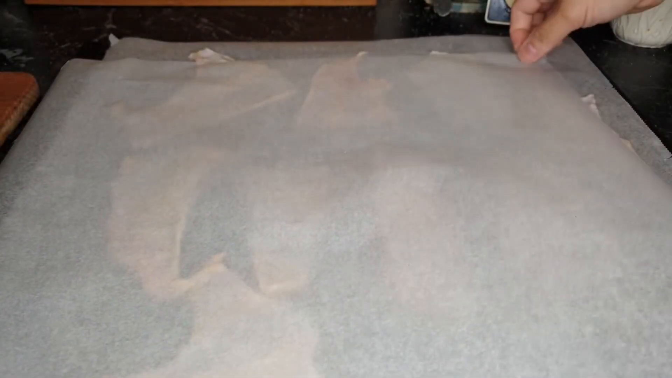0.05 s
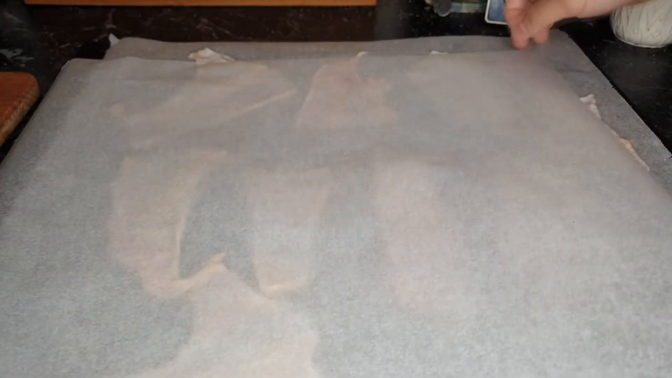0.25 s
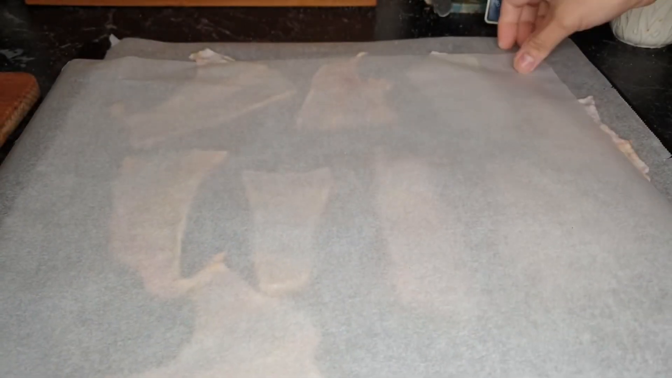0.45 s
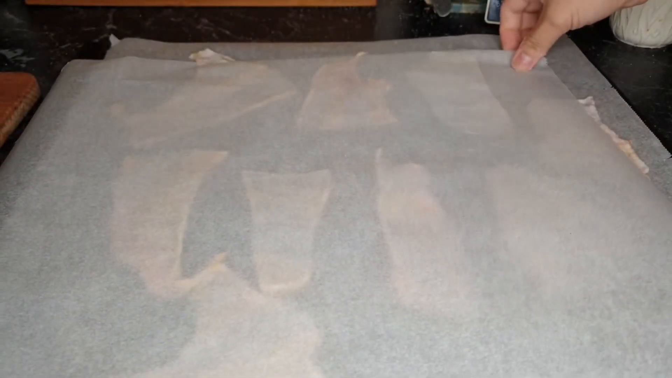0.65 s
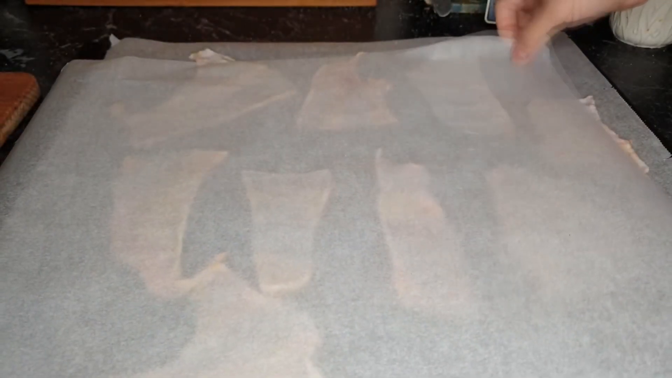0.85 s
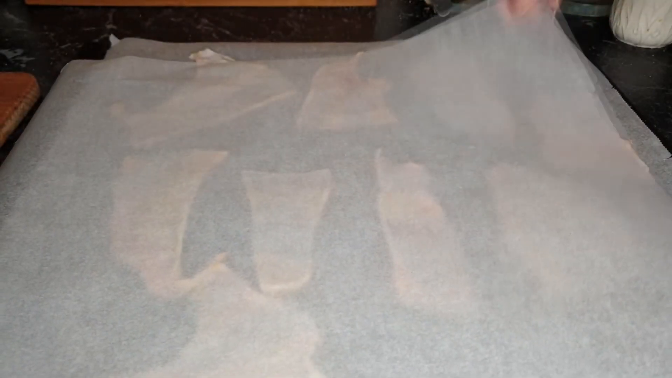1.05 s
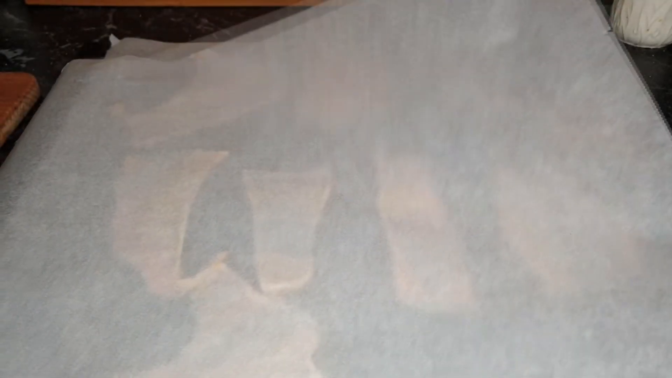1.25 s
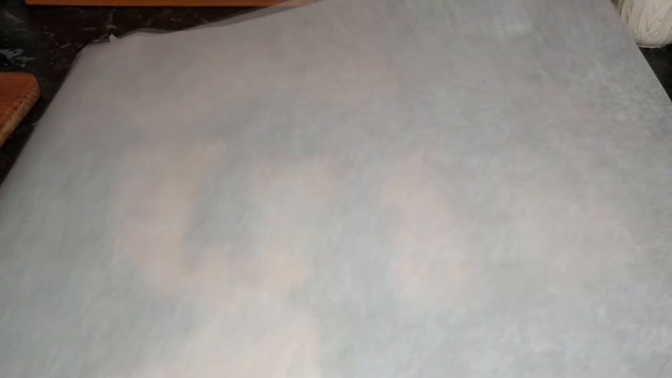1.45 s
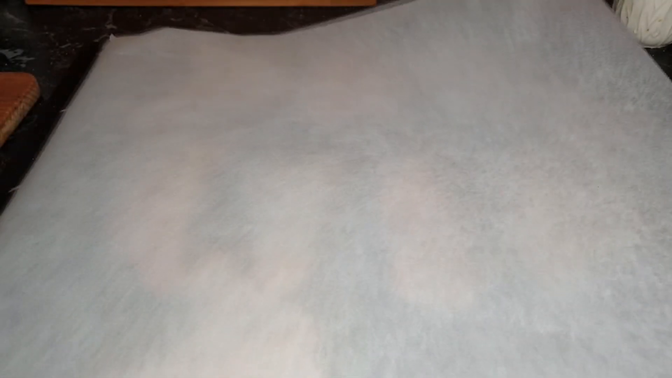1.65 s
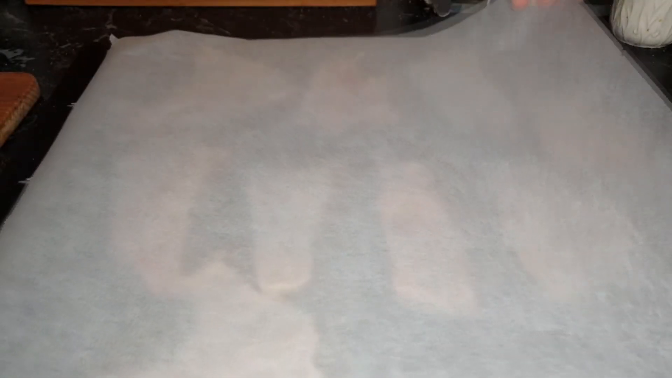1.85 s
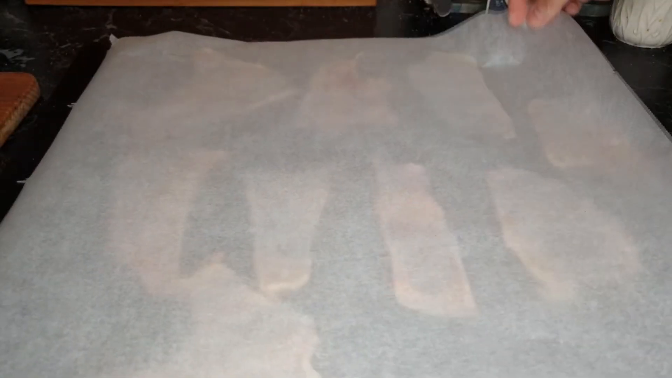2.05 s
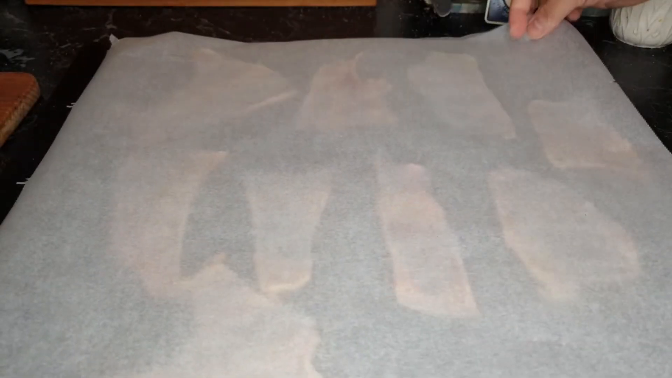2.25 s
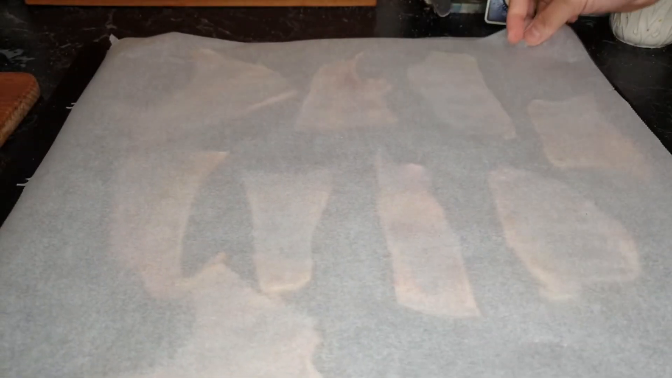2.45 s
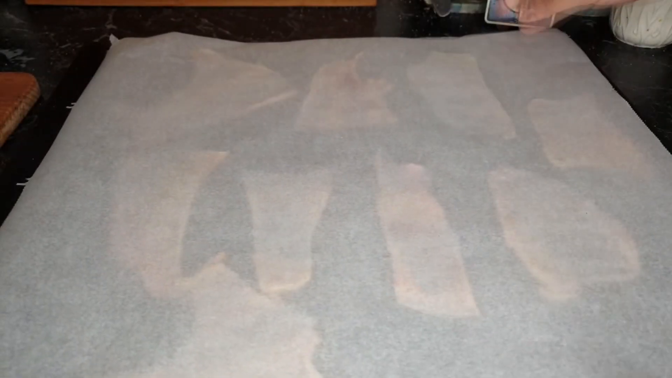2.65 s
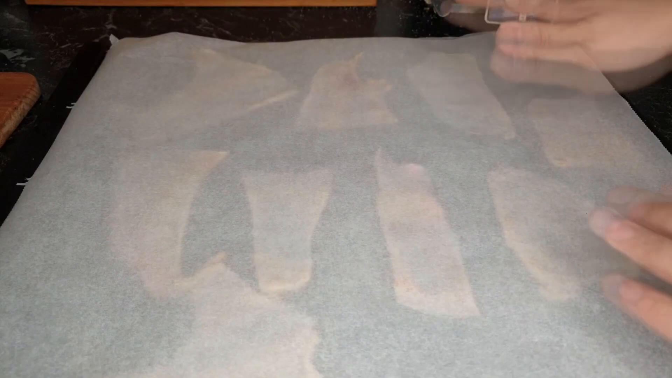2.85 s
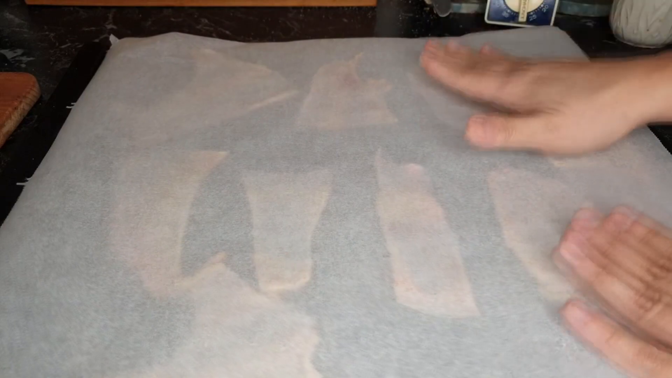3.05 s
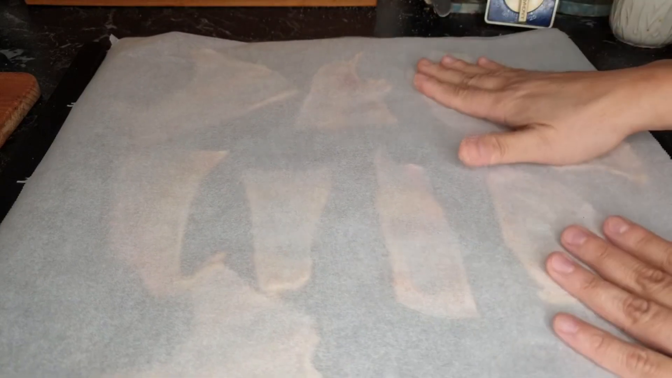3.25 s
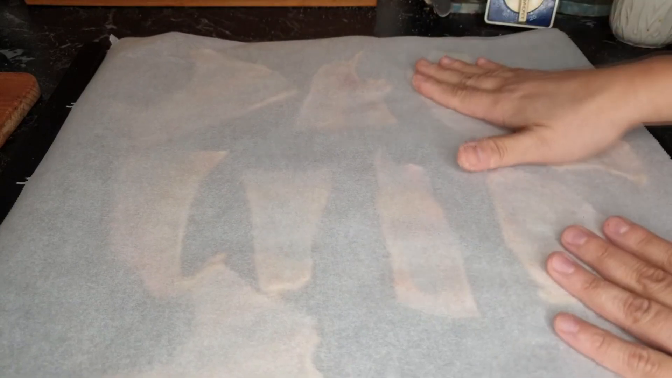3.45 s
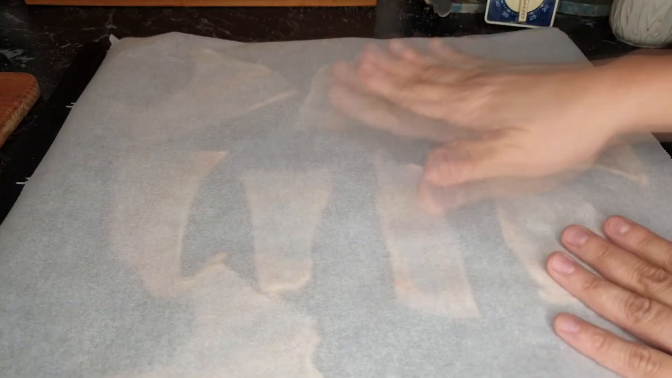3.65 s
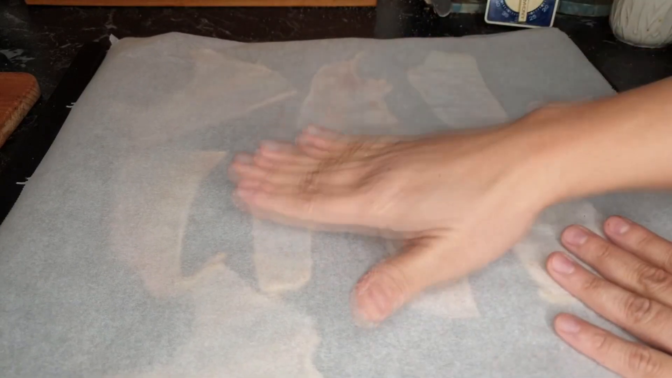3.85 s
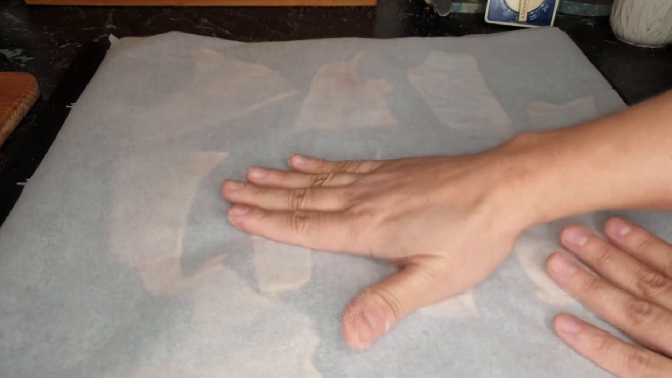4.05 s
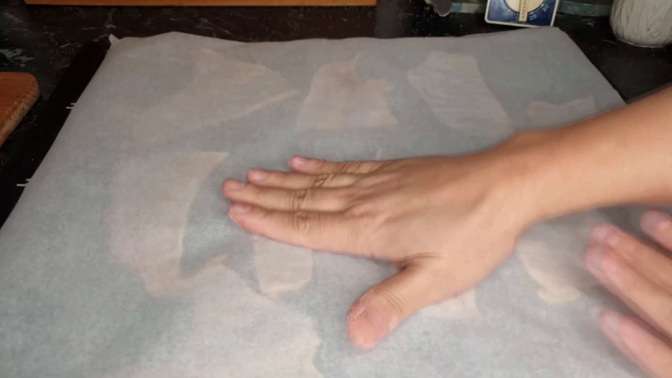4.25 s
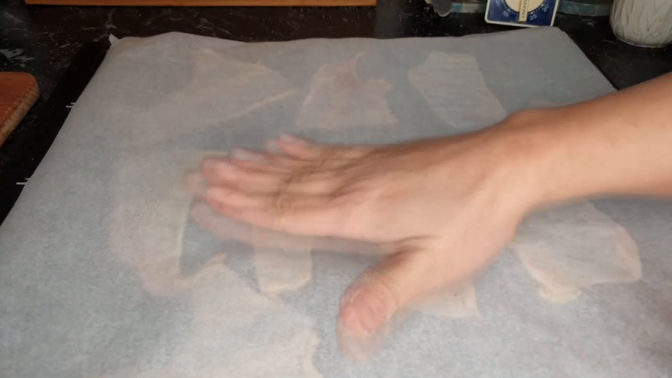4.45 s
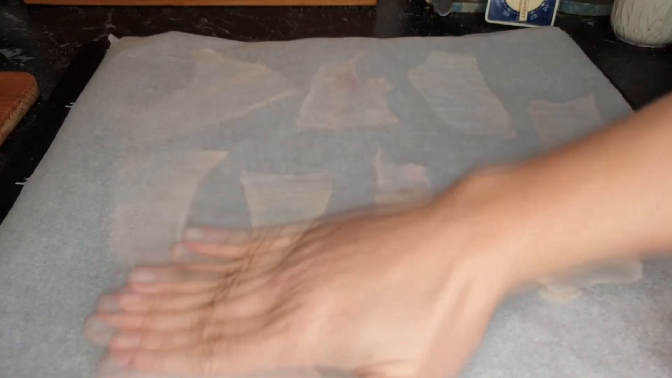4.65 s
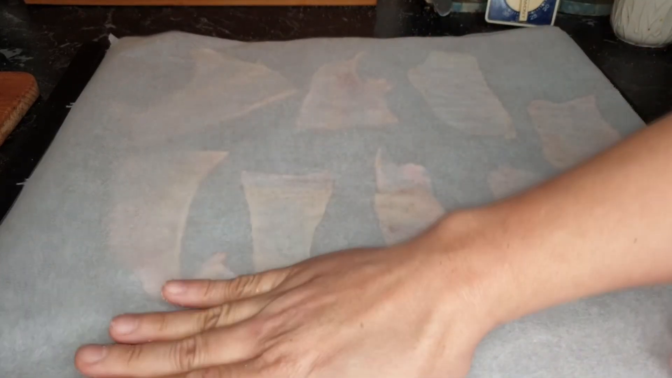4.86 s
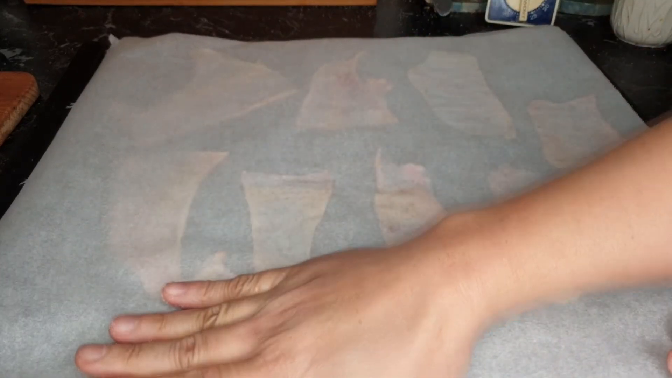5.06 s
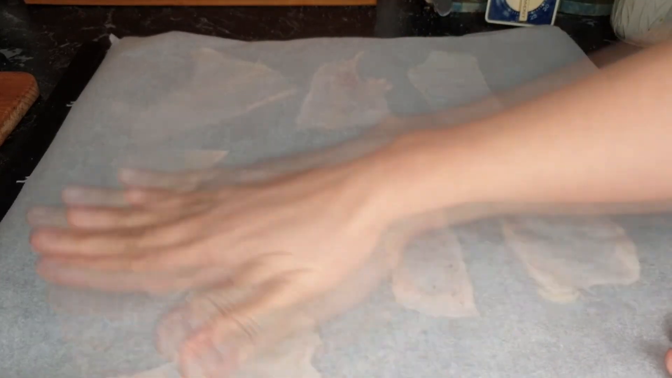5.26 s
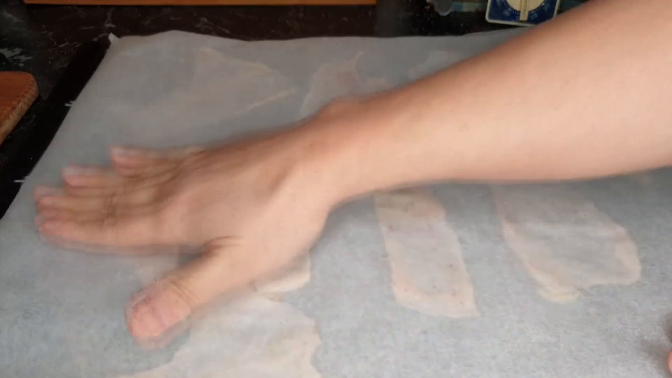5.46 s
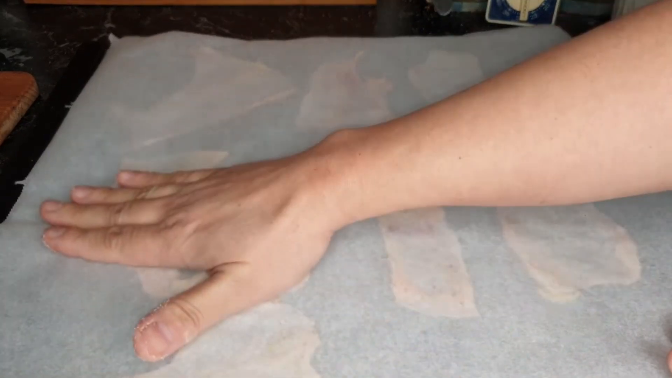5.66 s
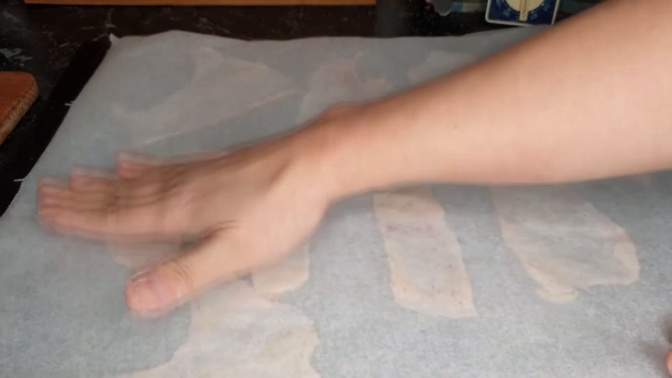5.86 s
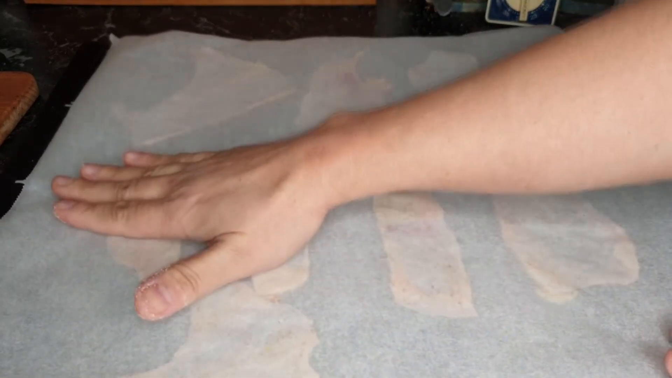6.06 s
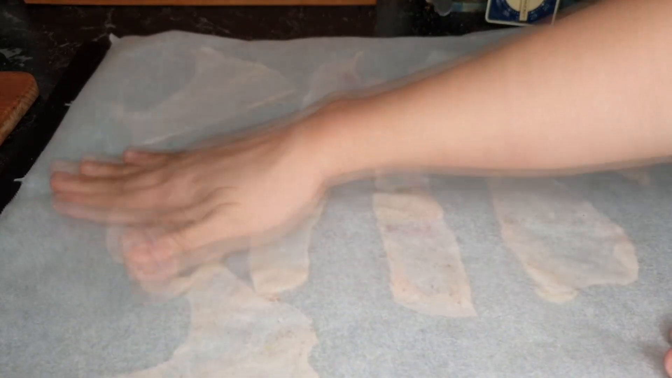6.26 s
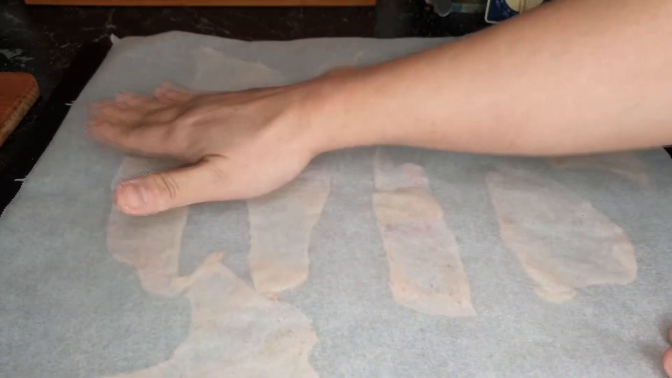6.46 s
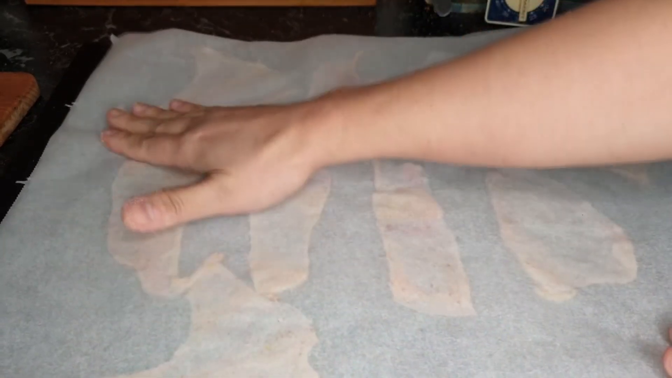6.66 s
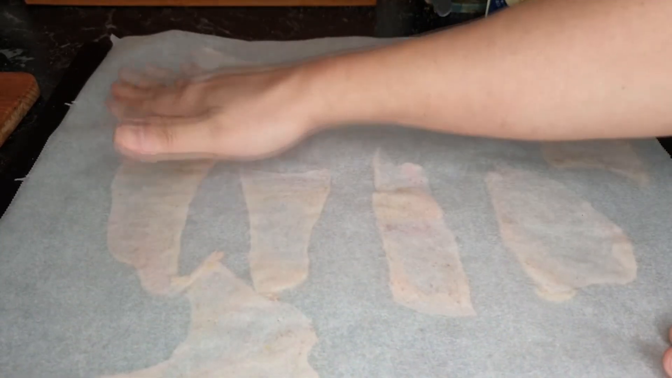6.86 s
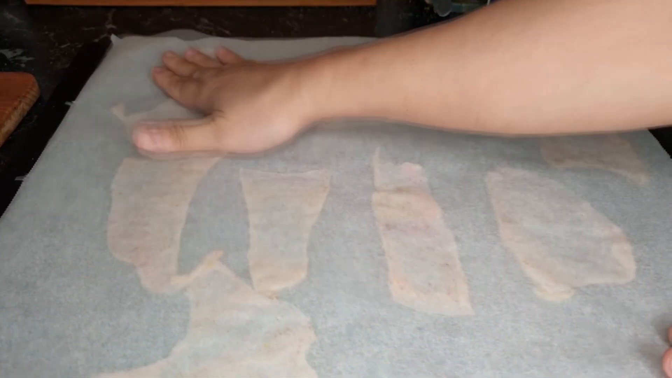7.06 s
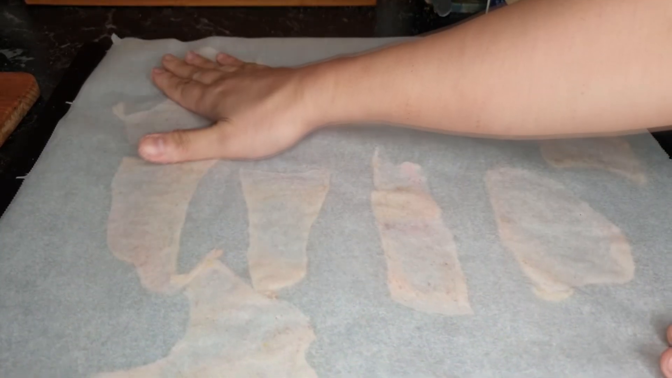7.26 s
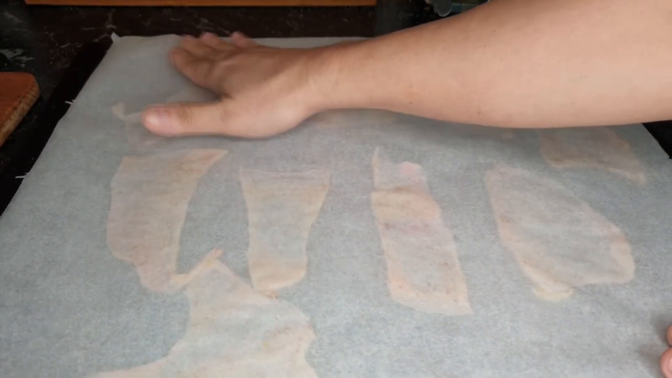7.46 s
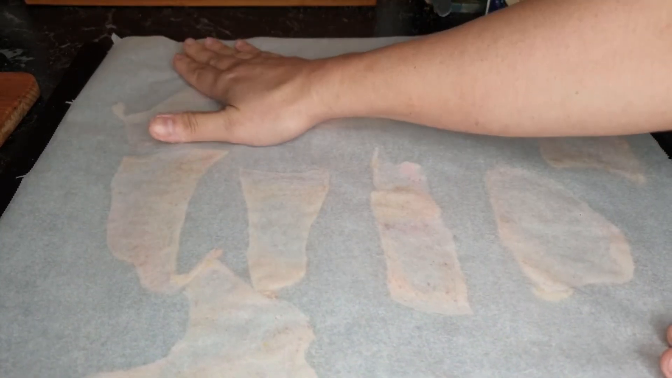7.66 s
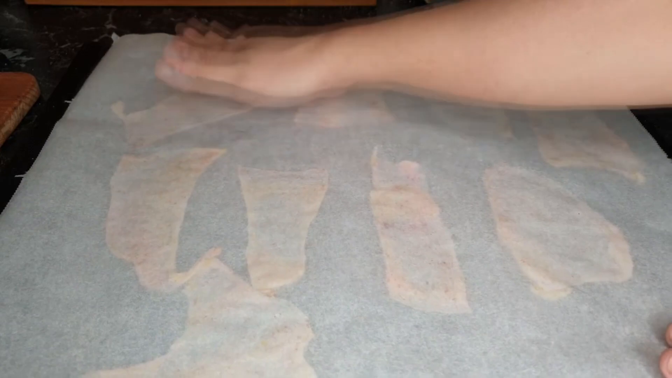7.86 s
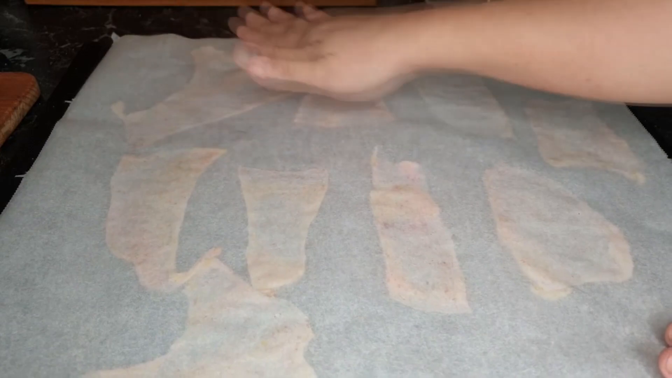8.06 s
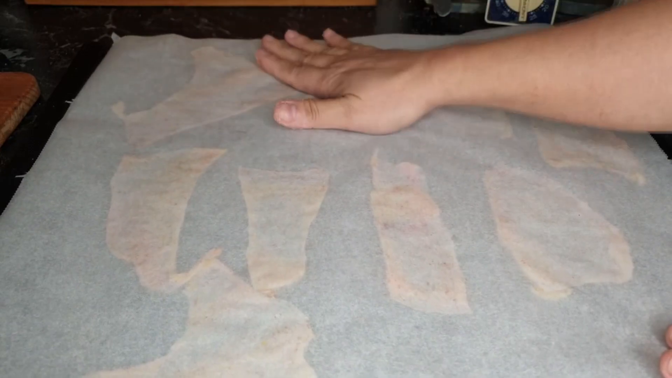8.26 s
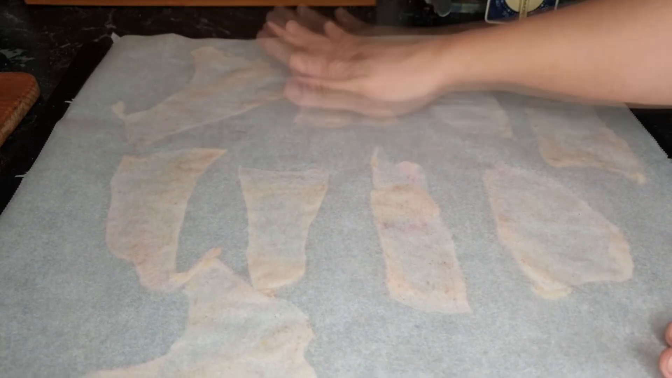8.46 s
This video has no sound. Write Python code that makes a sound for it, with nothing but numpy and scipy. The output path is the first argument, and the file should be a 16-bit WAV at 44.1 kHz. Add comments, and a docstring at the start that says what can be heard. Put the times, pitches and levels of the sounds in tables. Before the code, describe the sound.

A sheet of parchment paper is dragged over a baking pan, rustling with fine crackles and sharp little snaps. After a brief pause, a hand pats and smooths it flat in uneven, crinkly swells, with a light hiss of skin on paper and a few soft, low thuds from the pan. The sound is close and in stereo, in a small kitchen with a faint appliance hum.

```python
"""A sheet of parchment is dragged over a baking pan, then patted flat by hand, close to a spaced mic pair.
The stiff paper crackles in swarms of tiny buckles, hisses under sliding fingertips and snaps at its
creases. Bulges flip with a hollow pop, air flutters underneath, and firm presses thud in the pan.
A small kitchen answers, and an appliance hums and rumbles behind."""
import sys
import numpy as np
from scipy import signal
from scipy.fft import rfft, irfft, next_fast_len
from scipy.io import wavfile
from scipy.ndimage import uniform_filter1d, map_coordinates

SR = 44100
rng = np.random.default_rng(int(sys.argv[2]) if len(sys.argv) > 2 else 0)


def store_wav(level_fs):
    """Save 16-bit WAV to argv[1]."""
    pcm = np.round(np.clip(np.atleast_2d(level_fs), -1, 1) * 32767)
    wavfile.write(sys.argv[1], SR, pcm.T.astype(np.int16))


N = 375599

# the sheet dragged into place: (time [s], crackle level [dB], folds over crackle [dB])
DRAG_LEVELS = [(0, -47.5, -6.5), (.172, -45.5, -11.5), (.259, -52.5, -3), (.311, -56, -11.5),
               (.42, -54.5, -11), (.43, -45, -14), (.52, -43.5, -9.5), (.56, -52.5, -8.5),
               (.657, -49.5, -8.5), (.772, -44.5, -12.5), (.93, -46.5, -13.5), (.95, -37.5, -12),
               (1.153, -39, -7.5), (1.207, -29.5, -5), (1.27, -36, -11.5), (1.3, -46, -8.5),
               (1.335, -39.5, -7), (1.43, -46.5, -8.5), (1.774, -48, -4), (1.936, -50.5, -4),
               (1.966, -39.5, -10), (2.229, -45, -9.5), (2.385, -49, -16.5), (2.558, -51, -7.5),
               (2.654, -42, -15), (2.796, -68.5, -19), (2.99, -69, -3.5), (3.1, -90, 2)]
# the palm lands, rolls and peels off: (peak time [s], crackle level [dB], rise [s], fall [s],
# folds over crackle [dB], hollow over folds [dB])
PAT_SWELLS = [(3.149, -39.5, 0.02, 0.3, -6, -11), (3.31, -40.5, 0.027, 0.054, -17, -7),
              (3.402, -46, 0.067, .045, -29, -9), (3.454, -46.5, 0.019, 0.23, -14, -8),
              (3.59, -53.5, 0.12, 0.092, -11, -3), (3.863, -67, 0.041, 0.19, -20, -5),
              (4.043, -35.5, 0.029, 0.12, -11, -2.5), (4.19, -38.5, 0.2, 0.19, -7, -7.5),
              (4.401, -45.5, 0.27, .11, -18, -0.5), (4.9, -43.5, 0.16, 0.14, -6, -3),
              (4.979, -36, .15, .1, -9.5, -8), (5.168, -52.5, 0.043, 0.13, 0.5, -6),
              (5.236, -44.5, 0.12, 0.055, -7.5, -9), (5.324, -61.5, 0.22, 0.06, -27, -11),
              (5.601, -33.5, 0.043, 0.093, -14, -2), (5.711, -37.5, 0.02, 0.037, -5.5, -19),
              (5.76, -50.5, 0.088, 0.14, -8, -8), (5.911, -46, 0.17, 0.094, -11.5, -9),
              (6.078, -45.5, 0.013, 0.21, -13, -4), (6.168, -37.5, 0.085, 0.028, -10.5, -7),
              (6.369, -47.5, 0.17, 0.053, -10.5, -5.5), (6.605, -35.5, 0.016, 0.18, -6.5, -12.5),
              (6.878, -50.5, 0.093, 0.08, -5.5, -25), (7.13, -39, .008, 0.21, -6, -10),
              (7.339, -72, 0.55, 0.027, 1, -4), (7.367, -48, 0.011, 0.1, -9.5, -8),
              (7.435, -47.5, 0.079, 0.1, -26, -9), (7.609, -44.5, 0.053, 0.28, -9, -15),
              (7.861, -39, 0.072, 0.082, -12.5, -18), (7.936, -48.5, 0.15, 0.07, -8.5, -16),
              (8.286, -35.5, .012, 0.12, -9, -7), (8.473, -53, 0.17, .5, -8, -12)]
# the palm touches down: (time [s])
TOUCHDOWNS = [3.125, 3.8, 4.003, 4.816, 5.125, 5.541, 6.065, 6.586, 7.121, 7.357, 7.565, 8.269]
# fingertips sliding: (peak time [s], level [dB], rise [s], fall [s])
SLIDE_SWELLS = [(.06, -43, 0.067, 0.18), (.172, -41.5, .15, 0.035), (.259, -41.5, 0.07, 0.037),
                (.832, -37, 0.011, 0.031), (1.0, -42, .15, 0.18), (2.085, -37, .12, 0.097),
                (2.654, -33, 0.073, 0.044), (3.16, -43, .02, 0.17), (7.14, -39.5, 0.014, 0.067),
                (7.86, -43.5, 0.046, 0.11)]
# creases snapping: (time [s], mid-band level [dB], top band over mid [dB], t60 [s])
CREASE_SNAPS = [(0.1578, -31.5, -4, 0.094), (0.225, -43.5, -5, 0.049), (0.324, -45, -6, 0.021),
                (0.3495, -46, -18, 0.015), (0.3722, -38, -21, 0.042), (.39, -48, -12.5, 0.027),
                (0.4985, -31.5, 0.5, 0.04), (0.5862, -32, -5.5, 0.023), (.7124, -37, -8, .02),
                (0.832, -35, 0.5, 0.065), (0.944, -21.5, -5.5, 0.03), (1.01, -31.5, 0, 0.15),
                (1.077, -41, -16, 0.022), (1.1062, -17, -11, 0.014), (1.167, -33, -5.5, .025),
                (1.194, -21, -2, 0.064), (1.321, -34, -10, .03), (1.6573, -37.5, -14, .031),
                (1.6995, -43, -16, 0.11), (1.7475, -43, 1, .012), (1.7783, -35, -2, 0.019),
                (1.8272, -27.5, -3.5, .08), (1.871, -40, -6, .03), (1.9522, -31, -11.5, 0.028),
                (2.029, -41.5, -6, .025), (2.0818, -18.5, -5, 0.012), (2.22, -30.5, -4, 0.042),
                (2.401, -27.5, -3, .07), (2.4495, -35, -10, 0.027), (2.4964, -28, -5, 0.073),
                (2.616, -37.5, -3.5, 0.033), (2.7758, -46, -8, .015), (3.183, -31, -7, 0.017),
                (3.2677, -32.5, -3.5, 0.034), (3.3007, -33, -5, 0.013), (3.4481, -27.5, -6, 0.021),
                (3.579, -34, -7.5, 0.013), (3.613, -40.5, -7.5, .012), (3.7396, -45.5, 0, .012),
                (3.762, -52.5, 6, 0.013), (3.837, -59, -19.5, .012), (3.8509, -48, -3, .012),
                (3.8735, -50.5, -12, .012), (3.973, -42, 5, 0.009), (4.038, -34, -0.5, 0.13),
                (4.1196, -27, -11, 0.013), (4.145, -32.5, -0.5, 0.048), (4.179, -27, 0, 0.045),
                (4.2084, -28, -1.5, 0.022), (4.23, -36.5, -0.5, 0.084), (4.3066, -32, 2, 0.013),
                (4.3215, -37, 1, 0.032), (4.3852, -39, -11, .047), (4.616, -57, -20.5, .02),
                (4.929, -33, -8, .025), (4.961, -30, -5, 0.014), (4.9737, -21, -2, 0.016),
                (5.012, -30, -5, 0.026), (5.1538, -43, -20, 0.038), (5.3116, -44, -19, .029),
                (5.3916, -56.5, -15, 0.027), (5.487, -57, -7, .015), (5.5578, -42.5, -30, .041),
                (5.6514, -32, -7, 0.061), (5.7003, -38.5, -2.5, 0.017), (5.752, -42.5, -13, 0.021),
                (5.7706, -43.5, -5.5, 0.048), (5.8428, -41.5, -5, .02), (5.9153, -34.5, -8, 0.016),
                (6.1281, -36.5, 0, .02), (6.1554, -43.5, 4, .06), (6.2204, -38, -2, 0.011),
                (6.2568, -31, -10.5, .014), (6.317, -43.5, -6, 0.027), (6.359, -42, -7, 0.016),
                (6.498, -58, -1.5, .015), (6.6024, -30, -3, 0.19), (6.7332, -41, -6, .023),
                (6.875, -42.5, -18, 0.023), (6.9072, -40, -21, 0.017), (6.953, -48, 1, 0.0093),
                (7.058, -58, -14, .02), (7.1855, -30.5, -3, 0.023), (7.2257, -28.5, -0.5, .015),
                (7.2875, -46.5, 4, 0.017), (7.371, -45, -6, 0.08), (7.42, -49, -11, 0.018),
                (7.4405, -36.5, -4, 0.017), (7.5083, -46, -13, 0.016), (7.59, -47, -4.5, 0.025),
                (7.6734, -32, -0.5, 0.025), (7.75, -36.5, -3, 0.014), (7.829, -39.5, 0, 0.052),
                (8.175, -58, -10, .02), (8.281, -43.5, 3, 0.18), (8.329, -42, -6, .015),
                (8.355, -41, 0.5, 0.038), (8.462, -46, 0, 0.038), (8.475, -33.5, -9, 0.021)]
# bulges flipping: (time [s], relative level [dB], pitch [Hz])
BULGE_POPS = [(0.427, -27.5, 2460), (0.913, -29, 2480), (0.9986, -26, 2250), (1.077, -20.5, 2800),
              (1.5945, -26, 1860), (1.657, -30, 2070), (1.705, -27, 2300), (1.747, -25, 2540),
              (1.7784, -21, 2620), (1.8258, -14, 2500), (1.9131, -32, 2750), (2.0682, -28.5, 1110),
              (2.451, -37, 1210), (2.4955, -32, 1440), (3.5798, -32, 1810), (4.0208, -31, 1800),
              (4.1062, -30, 1710), (4.9592, -27.5, 2050), (5.1771, -35, 1830), (5.5983, -42, 1730),
              (5.6562, -31.5, 1630), (6.118, -35, 1620), (7.371, -48, 1610), (7.648, -32.5, 1630),
              (8.2758, -37, 1620), (8.4632, -38.5, 1900)]
# puffs under the sheet: (peak time [s], level [dB], rise [s], fall [s])
AIR_PUFFS = [(.672, -55.5, .02, 0.35), (1.122, -66, .4, .2), (1.206, -52, .13, 0.062),
             (2.07, -50.5, 0.052, 0.072), (2.992, -60.5, 0.053, 0.066), (4.05, -63.5, .04, 0.39),
             (5.108, -61.5, 0.056, 0.078), (7.752, -57, 0.069, 0.15), (8.29, -59.5, 0.027, .2)]
# firm presses on the pan: (time [s], relative level [dB], upper-mode trim [dB])
PRESSES = [(5.659, -46, -14), (5.714, -41, -8.5), (6.156, -37, -15), (6.687, -36.5, -6.5)]
# the pan's resonances, three low then five upper: (pitch [Hz], width [Hz], relative level [dB])
PAN_MODES = [(109.7, 12.3, -2), (75.7, 10, -4), (126, 13, -20), (196, 46, -13), (306, 47, -0.5),
             (463, 50, -6.5), (543, 49, -7), (745, 58, 0)]
# the hand's path across the stereo image: (time [s], left delay [ms], left over right [dB])
HAND_PATH = [(0, .14, -1.2), (2.5, .13, -1.5), (3.8, .17, -1.2), (4.6, .05, -.3), (5.2, -.06, -.3),
             (6.6, -.17, .6), (7.3, -.1, .2), (8.52, -.02, -.5)]
# the appliance's tones: (pitch [Hz], width [Hz], level [dB])
HUM_TONES = [(74.5, 7, -72), (100.4, 5, -73), (135, 12, -75.5), (200.7, 3, -73), (317, 21, -79.5)]

# EQ curves for the noise layers: (frequency [Hz], relative level [dB])
CRACKLE_EQ = [(1060, -36), (1800, -7), (3230, -4), (3810, 1), (6290, -0.5), (7430, -1), (8620, -6),
              (11200, -2), (15500, -8.5), (16000, -13), (16500, -45)]  # small buckles
TICK_EQ = [(1500, -120), (3000, -11), (7000, 5.5), (12000, -11.5), (17000, -3)]  # the smallest creases
FOLD_EQ = [(150, -120), (250, -12.5), (500, -13.5), (900, -6.5), (1600, -3.5), (2300, -3.5), (3500, -1),
           (6000, -120)]  # broad folds
HOLLOW_EQ = [(1000, -120), (1300, -14), (1670, 0), (2100, -13), (2800, -120)]  # the sheet under the palm
RUB_EQ = [(4000, -120), (5500, -19), (6800, -9), (7600, -1), (8300, -12), (11000, -14.5), (15500, -16.5),
          (17000, -42)]  # skin on paper
KITCHEN_EQ = [(13, -50.5), (22, -24.5), (70, -4), (143, -13.5), (205, -2), (229, -13.5), (263, -15.5),
              (387, -15), (554, -25), (710, -23.5), (961, -27), (3320, -43), (6810, -48), (14300, -44),
              (16000, -53)]  # room hiss and rumble
PUFF_EQ = [(60, -120), (120, -0.5), (210, -9.5), (350, 1), (460, -1.5), (700, -16.5), (1000, -4),
           (1600, -120)]  # air under the sheet
SNAP_MID_EQ = [(1500, -120), (2300, -8.5), (4000, 2.5), (7800, 6.5), (9500, -13.5), (14000, -120)]
SNAP_TOP_EQ = [(6000, -120), (8500, -8), (11000, -3.0), (15500, -13), (17000, -32.5)]

# stereo image of the sheet and of the room tone: (frequency [Hz], left-right correlation [1 = mono])
SHEET_IMAGE = [(60, 0.97), (290, 1), (640, 0.53), (1400, 0.28), (4000, 0.07), (15000, 0.11)]
KITCHEN_IMAGE = [(60, 0.39), (200, 0.91), (400, 0.72), (700, 0.15), (1300, 0.55), (15000, 0.55)]
# the kitchen's reverb time: (frequency [Hz], t60 [s])
KITCHEN_DECAY = [(200, 0.65), (2000, 0.23), (8000, 0.18), (16000, 0.057)]

SWELL_DB = 20  # a swell climbs this far in its rise time and sinks as far in its fall time
CONTROL_HOP = 32  # samples between envelope points
REST_DB, RUB_DB = -80.5, -13.5  # crackle floor at rest; skin hiss relative to the crackle
TREBLE_DB, TREBLE_PER_DB, PIVOT_DB = -2, -0.16, -50  # treble shelf: gain at the pivot level, slope, pivot
SETTLE_DB, SETTLE_S = -32, 0.27  # after each pat the sheet creeps back, faintly and slowly
TOUCH_S = 0.012  # contact spreads over the palm
SNAP_RISE, SNAP_LOW_DB = 0.025, -12  # a snap's attack as a share of its t60; its low band over its mid
SNAP_RIGHT_DB, SNAP_SCATTER_DB = 1.5, 2.5  # snaps sit right of the crackle, scattered about


def amp(db):
    """Gain of a level in dB."""
    return 10 ** (np.asarray(db) / 20)


def unit(x):
    """Normalise so that the average of the two channels has rms 1."""
    return x / np.sqrt(np.mean(np.mean(x, axis=0) ** 2) + 1e-20)


def along(points, hz):
    """Read a curve of (frequency, value) points on a log frequency axis."""
    freqs, values = np.transpose(points)
    return np.interp(np.log(hz + 1), np.log(freqs + 1), values)


def automation(rows):
    """One lane, sample by sample, for each column after the time."""
    times, *columns = np.transpose(rows)
    return [np.interp(np.arange(N) / SR, times, column) for column in columns]


def wobble(rate):
    """Random modulation with `rate` breakpoints a second."""
    points = rng.standard_normal(int(N * rate / SR) + 4)
    return map_coordinates(points, [np.arange(N) * rate / SR], order=1)


def filtered(x, response):
    """Apply a frequency response."""
    size = next_fast_len(N + 8192)
    return irfft(rfft(x, size) * response(np.fft.rfftfreq(size, 1 / SR)), size)[..., :N]


def stereo(noises, eq, image):
    """Turn two unrelated noises into a left and right with the given EQ and width."""
    def mid_side_gains(hz):
        angle = np.arccos(np.clip(along(image, hz), -1, 1)) / 2
        return amp(along(eq, hz)) * [np.cos(angle), np.sin(angle)]
    mid, side = filtered(noises, mid_side_gains)
    return unit(np.array([mid + side, mid - side]))


def balance(left_db):
    """Channel gains that put left this far over right."""
    return amp(np.array([left_db / 2, -left_db / 2]))


def swells(rows):
    """One envelope a row: a steady climb in dB to the peak, then a steady fall."""
    peak_s, db, rise, fall = np.transpose(rows)[:4, :, None]
    late = np.arange(0, N + CONTROL_HOP, CONTROL_HOP) / SR - peak_s
    return amp(db - SWELL_DB * np.maximum(-late / rise, late / fall))


def mixed(envelopes, trim_db=0):
    """The power sum of trimmed envelopes, at every sample."""
    total = np.sqrt(np.sum((amp(trim_db)[..., None] * envelopes) ** 2, axis=0))
    return np.interp(np.arange(N) / CONTROL_HOP, np.arange(len(total)), total)


def buckles(eq, spread_db, clump_db, grain_rate=900):
    """Swarms of tiny buckles: noise whose level jumps from grain to grain and clump to clump."""
    size = amp(spread_db * np.abs(wobble(grain_rate)) + clump_db * wobble(45))
    return stereo(size * rng.standard_normal((2, N)), eq, SHEET_IMAGE)


def patchy(x, depth_db):
    """Each patch of the sheet favours other pitches: a random, shifting EQ."""
    spectra = signal.stft(x, nperseg=256)[2]
    field = rng.standard_normal(spectra.shape[1:])
    field = uniform_filter1d(uniform_filter1d(field, 5, axis=0), 9, axis=1)
    coloured = spectra * amp(depth_db * field / field.std())
    return unit(signal.istft(coloured, nperseg=256)[1][:, :N])


def ticks(per_second, spread_db, t60=0.0064):
    """The smallest creases give lone bright ticks, a few much louder than the rest."""
    onsets = rng.random(N) < per_second / SR
    sizes = amp(spread_db * rng.exponential(size=N).clip(0, 3))
    envelope = signal.lfilter([1], [1, -amp(-60 / (t60 * SR))], onsets * sizes)
    return unit(envelope * stereo(rng.standard_normal((2, N)), TICK_EQ, SHEET_IMAGE))


def rustle():
    """The sheet crackles finely, booms in its folds and under the palm, and hisses under the skin."""
    drag_db, drag_fold_db = automation(DRAG_LEVELS)
    fold_db, hollow_db = np.transpose(PAT_SWELLS)[4:]
    pats = palm_gate() * swells(PAT_SWELLS)
    creep = palm_gate() * swells([(s, db, rise, SETTLE_S) for s, db, rise, *_ in PAT_SWELLS])
    crackle_gain = np.sqrt(amp(drag_db) ** 2 + mixed(pats) ** 2
                           + mixed(creep, SETTLE_DB) ** 2 + amp(REST_DB) ** 2)
    fold_gain = np.hypot(amp(drag_db + drag_fold_db), mixed(pats, fold_db))
    hollow_gain = mixed(pats, fold_db + hollow_db)
    rub_gain = np.hypot(amp(RUB_DB) * crackle_gain, mixed(swells(SLIDE_SWELLS)))

    crackle = patchy(buckles(CRACKLE_EQ, spread_db=2.5, clump_db=2.5), depth_db=2)
    crackle += amp(-12) * ticks(per_second=35, spread_db=5)
    treble = filtered(crackle, lambda hz: 1 / (1 + (8500 / (hz + 1)) ** 6))
    shelf_db = TREBLE_DB + TREBLE_PER_DB * (20 * np.log10(crackle_gain) - PIVOT_DB)
    crackle += (amp(shelf_db) - 1) * treble  # fainter crackle is finer and brighter
    folds = patchy(buckles(FOLD_EQ, spread_db=-0.5, clump_db=2.5, grain_rate=250), depth_db=3)
    hollow = buckles(HOLLOW_EQ, spread_db=1.5, clump_db=1.5, grain_rate=300)
    rub = buckles(RUB_EQ, spread_db=3.5, clump_db=1.6)
    return crackle_gain * crackle + fold_gain * folds + hollow_gain * hollow + rub_gain * rub


def room_tone():
    """A bed of hiss and rumble under the wavering hum of an appliance."""
    bed = amp(-68) * stereo(rng.standard_normal((2, N)), KITCHEN_EQ, KITCHEN_IMAGE)
    t = np.arange(N) / SR
    for hz, width_hz, db in HUM_TONES:
        waver = wobble(width_hz) + 1j * wobble(width_hz)  # smears the tone into narrow noise
        bed += amp(db) * np.real(waver * np.exp(2j * np.pi * hz * t))
    return bed


def snap_noise(eq):
    """The body of a snap: noise compressed toward an even level over every 3 ms."""
    noise = stereo(rng.standard_normal((2, N)), eq, SHEET_IMAGE)
    power = np.abs(uniform_filter1d(np.mean(noise, axis=0) ** 2, size=130))
    return noise / np.sqrt(power + 0.18)


def snaps():
    """A crease gives way in a sudden avalanche of buckles that dies out."""
    t = np.arange(SR // 6) / SR
    envelopes = np.zeros((3, 2, N + SR))  # band, channel, sample
    for s, db, top_db, t60 in CREASE_SNAPS:
        attack = 1 - np.exp(-t / (SNAP_RISE * t60))
        burst = attack * amp(db - 60 * t / t60)
        position = balance(SNAP_SCATTER_DB * rng.standard_normal() - SNAP_RIGHT_DB)
        gains = amp([[SNAP_LOW_DB], [0], [top_db]]) * position
        envelopes[..., round(s * SR):][..., :len(t)] += gains[..., None] * burst
    bands = [snap_noise(eq) for eq in (FOLD_EQ, SNAP_MID_EQ, SNAP_TOP_EQ)]
    return np.sum(envelopes[..., :N] * bands, axis=0)


def pops(attack_s=0.00086, t60=0.014):
    """A bulge flips over and rings briefly, a cluster of near pitches set by its size."""
    out, t = np.zeros(N + SR), np.arange(SR // 20) / SR
    envelope = (1 - np.exp(-t / attack_s)) * amp(-60 * t / t60)
    for s, db, hz in BULGE_POPS:
        pitches = hz * (1 + rng.normal(0, 0.13, (4, 1)))
        ring = np.sin(2 * np.pi * pitches * t).sum(axis=0)
        out[round(s * SR):][:len(t)] += amp(db - 6) * envelope * ring
    return out[:N]


def flutter():
    """The lifting or settling sheet pumps low puffs of air."""
    return mixed(swells(AIR_PUFFS)) * buckles(PUFF_EQ, spread_db=-4, clump_db=0.5, grain_rate=110)


def palm_gate():
    """For each pat, a gate that opens at the last touchdown before its peak."""
    peak_s = np.transpose(PAT_SWELLS)[0]
    down_s = np.take(TOUCHDOWNS, np.searchsorted(TOUCHDOWNS, peak_s) - 1)
    t = np.arange(0, N + CONTROL_HOP, CONTROL_HOP) / SR
    return np.clip((t - down_s[:, None]) / TOUCH_S, 0, 1)


def pan_response(hz, modes, low_hz, high_hz, polarity=1):
    """Damped modes, band-passed: a small pan radiates no deep bass. Polarity -1 alternates their signs."""
    ring = sum(polarity ** k * amp(db) * 1j * hz * width / (pitch ** 2 - hz ** 2 + 1j * hz * width)
               for k, (pitch, width, db) in enumerate(modes))
    return ring * (1j * hz / (low_hz + 1j * hz) / (1 + 1j * hz / high_hz)) ** 2


def pan_thuds():
    """The palm pushes, then scuffs while it holds, exciting the pan's modes."""
    force, t = np.zeros((2, N + SR)), np.arange(SR // 8) / SR
    for s, db, upper_db in PRESSES:
        press = 0.042 * np.exp(-(t / 0.066) ** 2) * rng.standard_normal(len(t))  # the scuff
        press[0] += 1.3  # the push
        drive = amp([[db + 56], [db + upper_db + 50]])  # low modes, upper modes
        force[:, round(s * SR):][:, :len(t)] += drive * press
    low = filtered(force[0, :N], lambda hz: pan_response(hz, PAN_MODES[:3], 60, 170))
    upper = filtered(force[1, :N], lambda hz: pan_response(hz, PAN_MODES[3:], 80, 520, polarity=-1))
    return low + upper * balance(left_db=3)[:, None]


def follow_hand(x):
    """As the hand moves across, the balance shifts and the left mic hears the sheet earlier or later."""
    delay_ms, left_db = automation(HAND_PATH)
    left = map_coordinates(x[0], [np.arange(N) - delay_ms * SR / 1000], order=3)
    return balance(left_db) * np.array([left, x[1]])


def kitchen_reverb(x):
    """The small kitchen answers with a short tail whose highs die first."""
    hz, t, spectra = signal.stft(rng.standard_normal((2, SR // 2)), SR, nperseg=256)
    decay = amp(-60 * t / along(KITCHEN_DECAY, hz)[:, None])
    tail = signal.istft(spectra * decay, SR, nperseg=256)[1]
    predelayed = np.pad(x, ((0, 0), (250, 0)))
    return signal.fftconvolve(predelayed, tail / np.linalg.norm(tail[0]), axes=1)[:, :N]


def scene():
    """Paper and pan up front, a touch of reverb on the paper, room tone behind."""
    paper = follow_hand(rustle() + snaps() + pops() + flutter())
    return paper + pan_thuds() + amp(-14) * kitchen_reverb(paper) + room_tone()


def record(dry):
    """A brick-wall high cut at 16 kHz."""
    return filtered(dry, lambda hz: hz < 16000)


dry = scene()
out = record(dry)
store_wav(out)
```